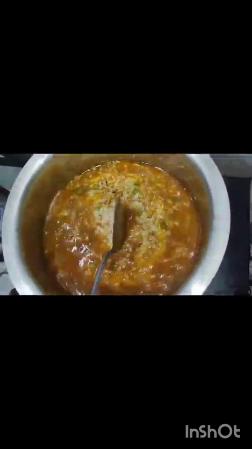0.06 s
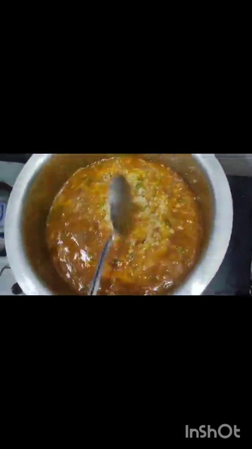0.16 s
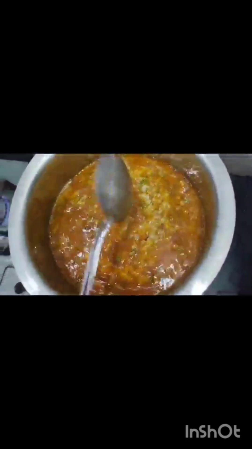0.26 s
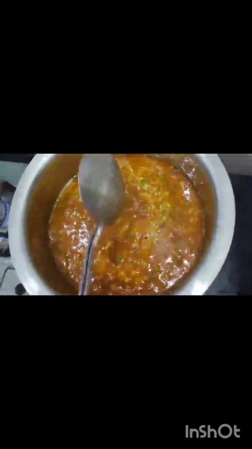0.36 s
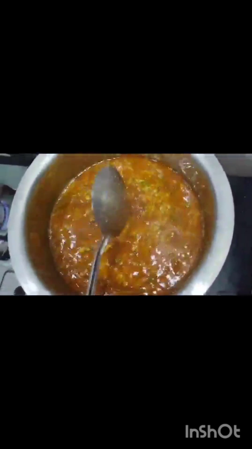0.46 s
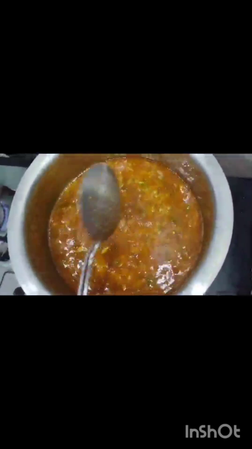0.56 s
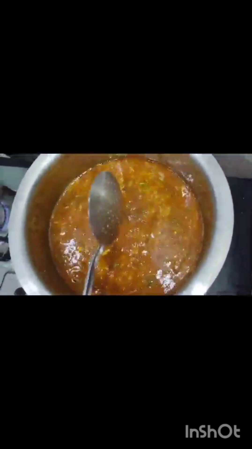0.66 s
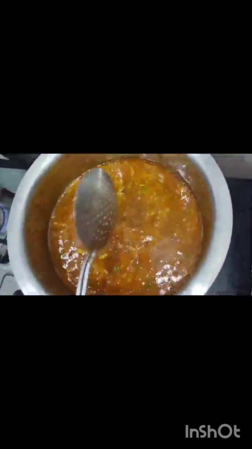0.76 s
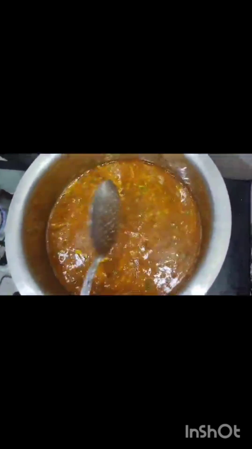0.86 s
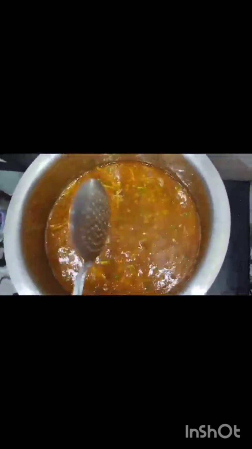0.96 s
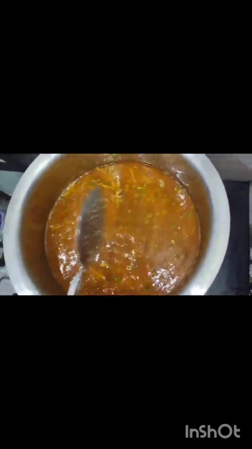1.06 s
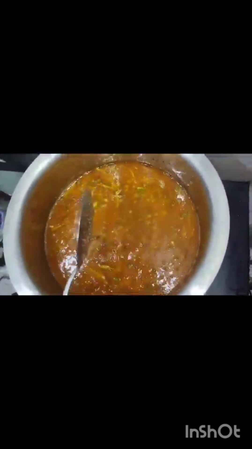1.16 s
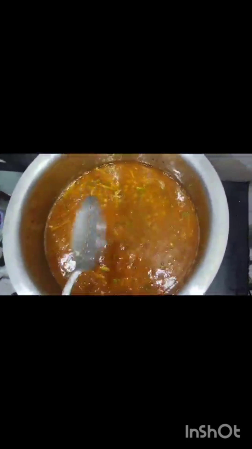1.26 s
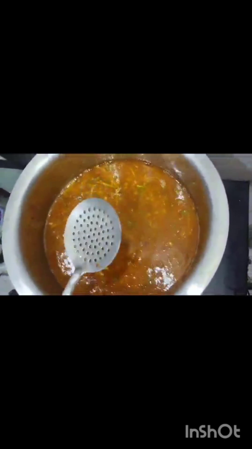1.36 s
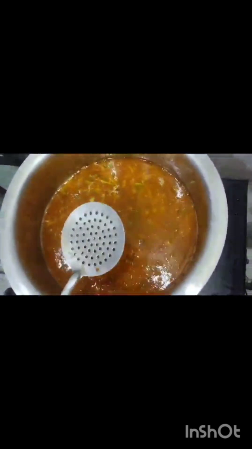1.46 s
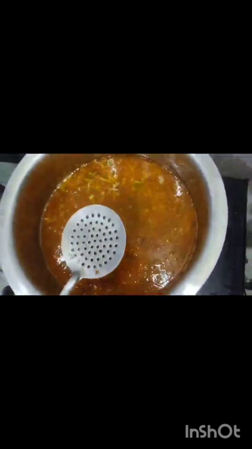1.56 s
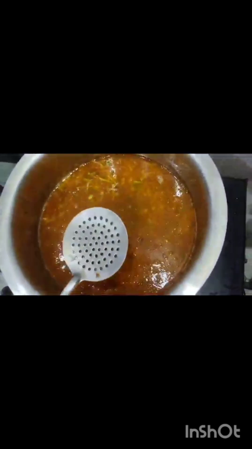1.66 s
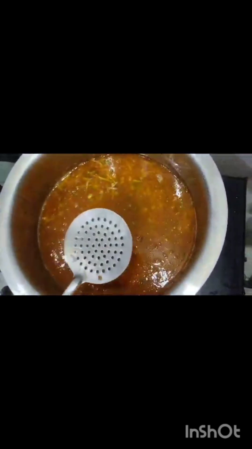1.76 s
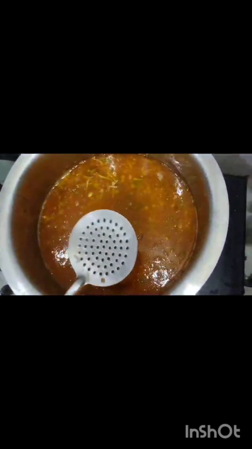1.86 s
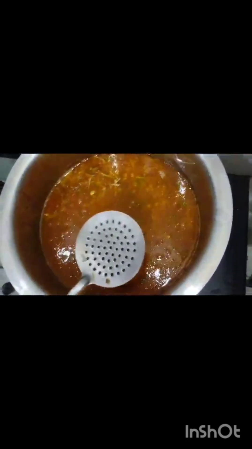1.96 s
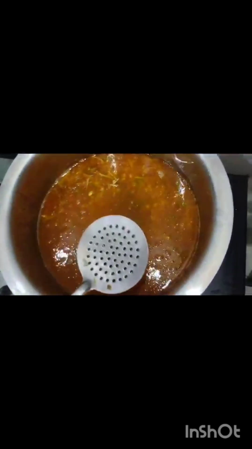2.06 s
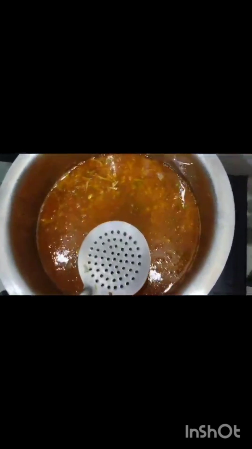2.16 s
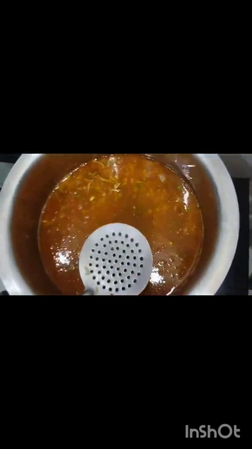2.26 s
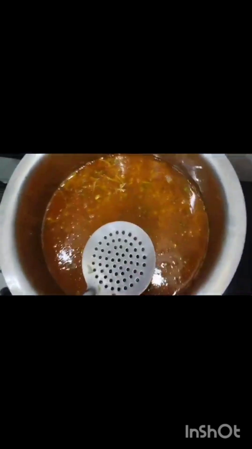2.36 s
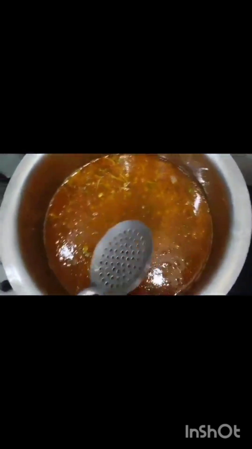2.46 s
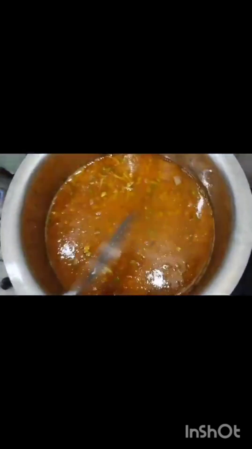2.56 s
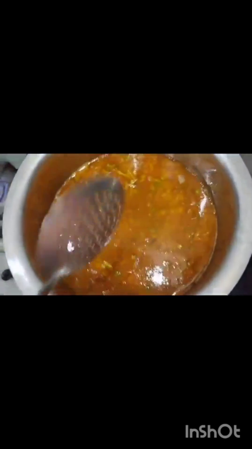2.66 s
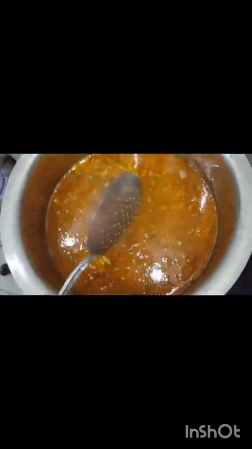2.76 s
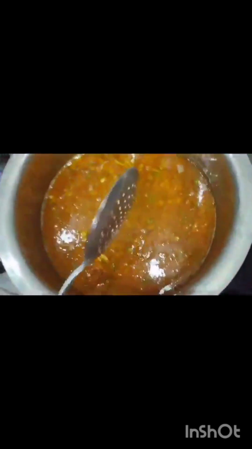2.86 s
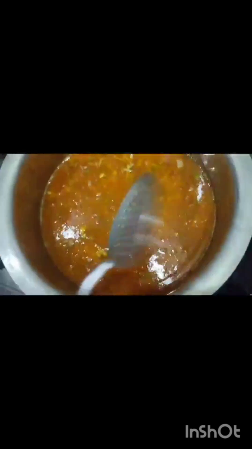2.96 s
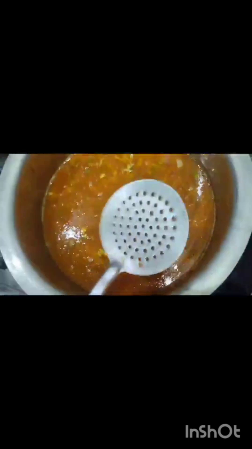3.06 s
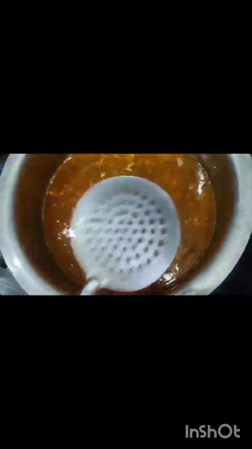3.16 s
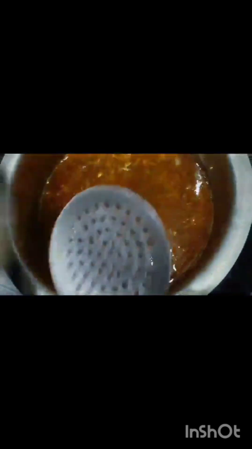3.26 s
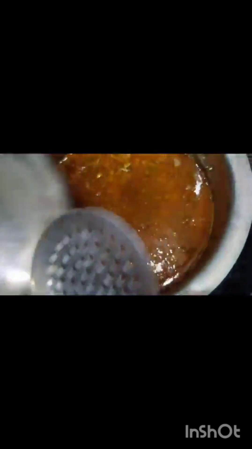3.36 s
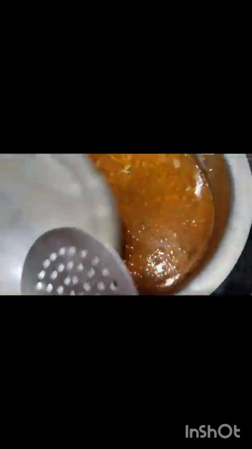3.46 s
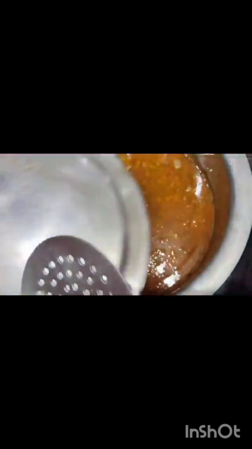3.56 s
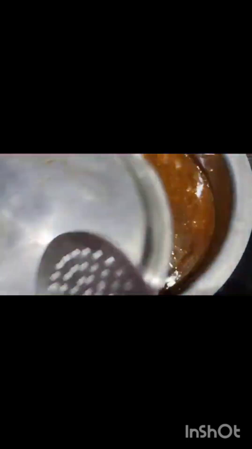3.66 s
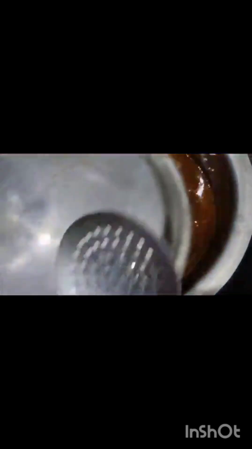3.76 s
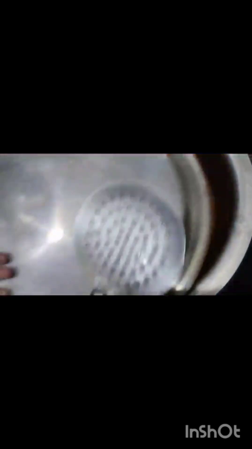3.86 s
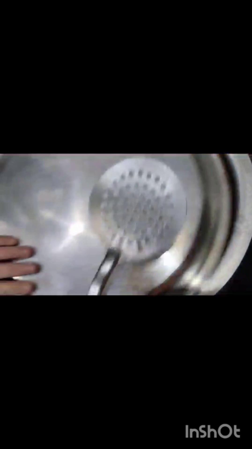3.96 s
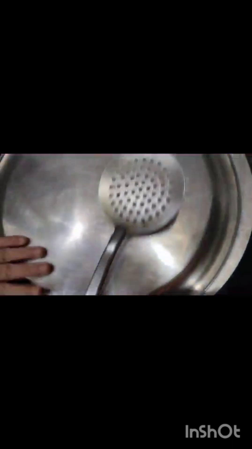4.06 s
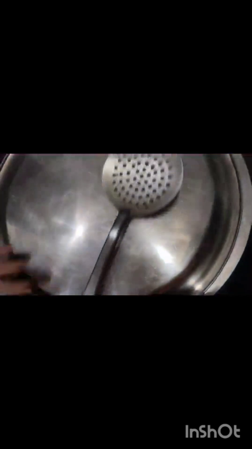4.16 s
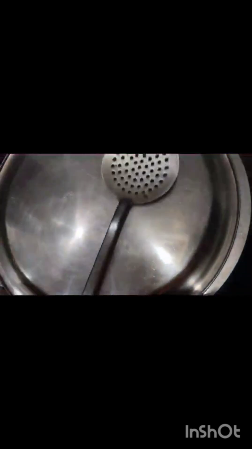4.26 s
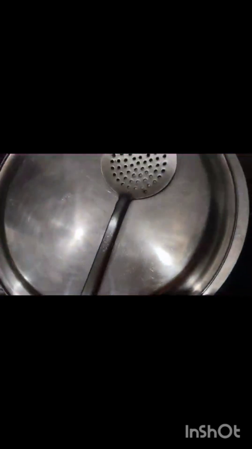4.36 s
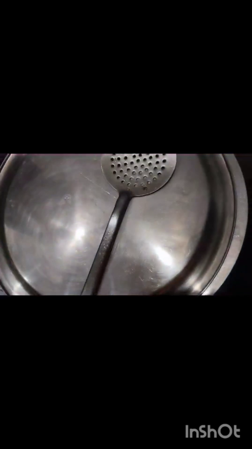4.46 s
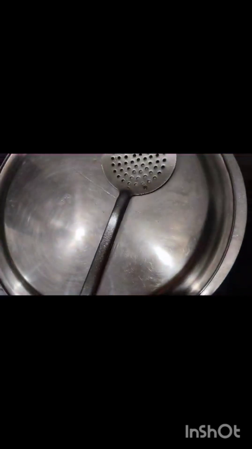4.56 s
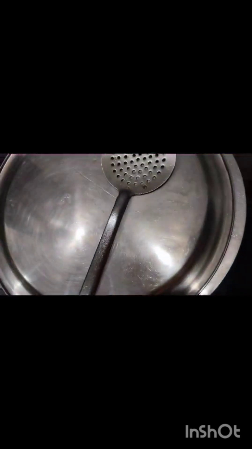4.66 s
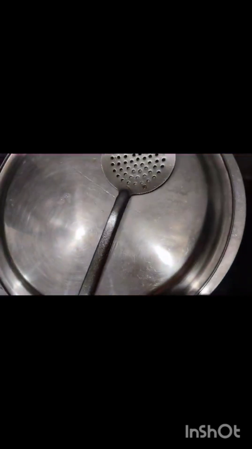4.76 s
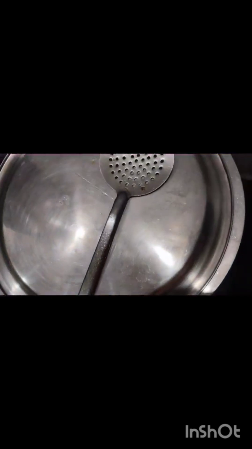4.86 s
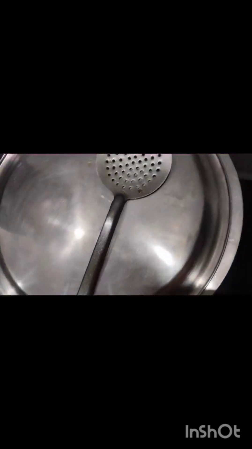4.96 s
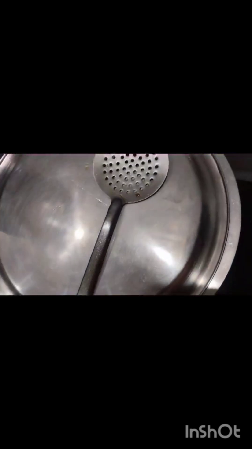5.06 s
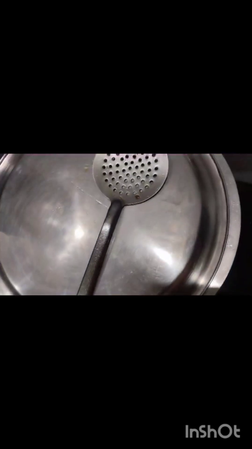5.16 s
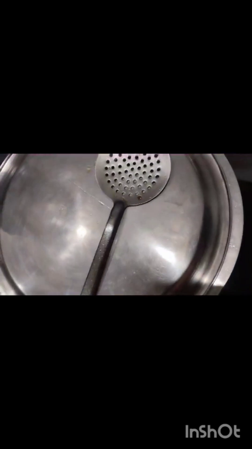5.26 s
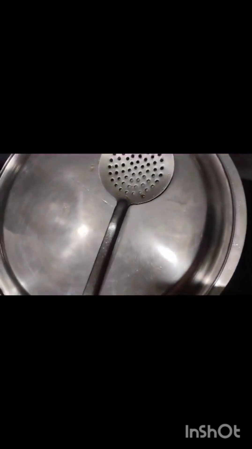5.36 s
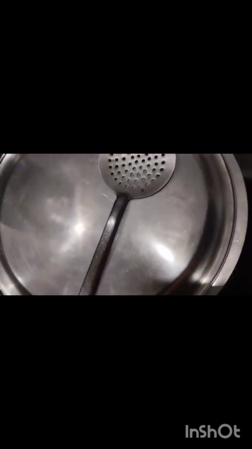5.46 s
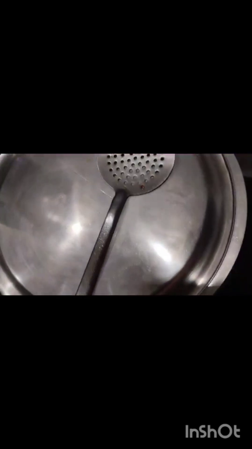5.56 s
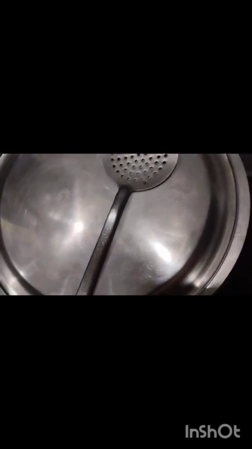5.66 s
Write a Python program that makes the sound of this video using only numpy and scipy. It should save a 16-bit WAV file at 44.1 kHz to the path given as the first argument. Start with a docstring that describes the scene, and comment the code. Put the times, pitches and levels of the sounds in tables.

```python
"""In a small hard kitchen, a slotted steel spoon is knocked clean on the rim of a big pot of curry.
Each blow rings pot and spoon as decaying sines and rocks the pot, which falls back as a burst of noise.
The spoon scrapes along the rim as grainy noise through its own ring, and taps again; a steel lid clashes on,
slides shut with a sinking hum and drops into its seat with the spoon on top.
Noise tails give the echoes; a low rush, an electric hum and a thin hiss lie underneath."""
import sys
import numpy as np
from scipy import signal
from scipy.fft import rfft, irfft, next_fast_len
from scipy.io import wavfile
from scipy.ndimage import uniform_filter1d

SR = 44100
rng = np.random.default_rng(int(sys.argv[2]) if len(sys.argv) > 2 else 0)


def log_audio(samples):
    """Write samples as a 16-bit WAV file to the path given in sys.argv[1]."""
    # one column per channel
    frames = np.atleast_2d(samples).T
    # limit to full scale, then quantise
    limited = np.clip(frames, -1, 1)
    pcm = np.round(limited * 32767).astype(np.int16)
    wavfile.write(sys.argv[1], SR, pcm)


N = 251446  # length in samples

# Colours of noise; only their shape counts. Each row: frequency in Hz, density in dB per Hz.
# The low rush, as of a burner
RUSH_SPECTRUM = [(20, -15), (35, 5.5), (50, 7), (70, 0), (100, 2.5), (150, -0.5), (300, -4.5), (700, -7),
                 (1200, -11), (1700, -9.5), (2700, -14.5), (4500, -26), (10000, -35), (16000, -41)]
# The narrow hiss of the microphone
HISS_SPECTRUM = [(20, -60), (5500, -35.5), (6500, -13), (6950, 2.5), (7230, 8.5), (7600, -4.5), (8000, 3),
                 (8600, -18.5), (10000, -22), (13000, -30.5), (14500, -18), (16000, -46.5)]
# The rub of steel on steel
FRICTION_SPECTRUM = [(150, 1.5), (800, -4), (2400, 0.5), (3500, -7), (6000, -4.5), (9000, -1.5),
                     (12000, -12.5), (16000, -19.5)]
# The loose lid sheet buzzing
PANEL_SPECTRUM = [(100, -20), (280, 1.5), (450, 8), (900, -5.5), (1200, -4.5), (1700, -15), (2500, -7),
                  (5000, -19.5), (16000, -29.5)]
# The lid meeting the rim
CLASH_SPECTRUM = [(100, 1), (500, 14.5), (1200, -2.5), (1900, -4.5), (3000, -1.5), (4200, 4), (6500, 0.5),
                  (8500, -3.5), (12000, -12), (16000, -25.5)]
# The grate rattling under the pot
GRATE_SPECTRUM = [(25, -30.5), (70, -9.5), (150, 5.5), (450, -5.5), (800, -5.5), (1200, -10), (1800, -8),
                  (3000, -18), (6000, -48), (12000, -28), (16000, -26)]
# The sharp crack of a blow
CRACK_SPECTRUM = [(100, -3.5), (400, 0), (1000, 1), (2000, 0), (3000, 4.5), (5400, 1), (8500, 5),
                  (12000, -5.5), (16000, -7.5)]

# Ringing modes. Each row: frequency in Hz, relative energy in dB, time to fall 60 dB in seconds.
# The pot wall, quickly damped by the curry
POT_MODES = [(1580, -2.5, 0.013), (1770, 1.5, 0.029), (2538, 0, 0.07), (2961, -3.5, 0.0356),
             (3342, 1, 0.0191), (3658, -7.5, 0.0164), (3958, -3, 0.0133), (4223, -2.5, 0.039),
             (4494, -0.5, 0.028), (4886, -1.5, 0.045), (5148, 4.5, 0.0214), (5485, 3.5, 0.0196),
             (5828, 2, 0.0194), (6240, 4, 0.0153), (6651, 0.5, 0.046), (7190, -0.5, 0.0202),
             (7466, 0, 0.107), (8010, -5.5, 0.023), (8386, -1.5, 0.057), (8579, 2.5, 0.019),
             (9270, 1, 0.062), (9840, -13, 0.018), (10543, -9.5, 0.034), (10770, -18, 0.046),
             (11600, -15.5, .028)]
# The spoon
SPOON_MODES = [(392, -8, .3), (738, -6, .27), (1922, -11, .22), (2490, -13, .2), (2783, -29, .35),
               (3687, -1.5, .15), (3900, -6, .19), (4215, -1, .06), (4300, -5, .12), (4565, -13, .28),
               (4866, -7, .13), (4985, -10, .22), (5540, -14, .15), (6223, -14, .16), (7630, -15, .15),
               (7955, -10, .16)]
# The stove top
STOVE_MODES = [(155, -7, .2), (199, -.5, .45), (232, -7, .2), (390, -8, .28), (425, -1, .26), (452, -4, .2),
               (510, -4, .2), (655, -6, .15), (700, -7, .14)]
# The pot rocking as a whole
ROCKING_MODES = [(65.5, 0, .32), (78, -13, .16)]
# The lid sheet
LID_MODES = [(399.2, -8.5, 0.38), (453.6, -1.5, 0.41), (481.4, 0, 0.366), (545.8, -12.5, 0.69),
             (626.5, -18.5, 0.3), (660, -9, 0.225), (749, -2.5, 0.304), (803.8, -3, 0.503),
             (840, -6.5, 0.84), (891.2, -2.5, 0.253), (1002.8, -13, 0.51), (1372, -13.5, 0.223),
             (1599, -4, 0.159), (1628, -12, 0.45), (1889, -12, 0.35), (2170, -7.5, 0.254),
             (2420, -9.5, 0.27)]
# The pot with its lid on
COVERED_POT_MODES = [(126, 0, .28), (160, -8, .2), (205, -.5, .32), (254, 0, .55), (275, -10, .3),
                     (344, -9, .25), (468, -15, .8), (813, -21, 2.2)]

# Bending of the spoon handle; the close pair throbs. Each row: frequency in Hz, relative level in dB.
HANDLE_MODES = [(184, -7), (201, 0), (438, -11)]
# Scraping strokes that swell and fade. Each row: time of the height in seconds,
# half length in seconds (to 1/e), relative friction in dB.
STROKES = [(1.839, 0.0303, -34), (2.004, 0.0784, -39.5), (2.156, 0.0478, -33.5), (3.605, 0.153, -48.5),
           (3.911, 0.0495, -51.5)]
# The lid shoved along the rim. Each row: start in seconds, length in seconds, relative level in dB,
# hum at the start in Hz.
SHOVES = [(3.723, 0.052, -31, 289.9), (3.794, 0.0283, -32, 277.4), (3.843, 0.0166, -36.5, 255.7),
          (3.915, 0.076, -38, 289.3)]
# The lid meeting pot and spoon. Each row: start in seconds, relative clash in dB, relative lid ring in dB,
# frequency that the spot favours in Hz.
KNOCKS = [(3.252, -30, -24.5, 740), (3.316, -25, -26, 760), (3.3974, -11, -17, 500), (3.453, -20, -21, 610),
          (3.486, -29.5, -27.5, 595), (3.616, -42, -49, 900), (4.075, -26.5, -25, 506),
          (4.10, -29.5, -20.5, 796), (4.132, -36, -18.5, 850), (4.176, -25, -32.5, 850),
          (4.225, -35, -29, 780), (4.29, -53.5, -32, 483)]
# The spoon on the rim. Each row: start in seconds, relative strength in dB,
# push on the pot in dB relative to the strength, seconds until the pot falls back.
TAPS = [(0.2228, -18.5, 4.5, 0.00284), (.435, -22, 2.5, 0.021), (.6349, -22.5, 1.5, .018),
        (.796, -20, 3, 0.01187), (.946, -23.5, -0.5, 0.01094), (1.0489, -34.5, -13, 0.00547),
        (2.5521, -15.6, 2.6, 0.0043), (2.7812, -21.5, -4.5, 0.00598), (3.0773, -15, -19, 0.002754),
        (3.248, -19, -19.5, 0.00773)]

# The first stroke bites and sets the handle shuddering
SHUDDER_DB, SHUDDER_SWELL_S, SHUDDER_T60_S = -32.5, 0.028, 0.75
SHOVE_ATTACK_S, SHOVE_RELEASE_S, SAG_HZ_PER_S = 0.00443, 0.0084, 300
SHOVE_BUZZ_DB, SHOVE_GRIT_DB = -11.5, -12.5  # relative to the hum
SHOVE_ROUGH_DB, SHOVE_JITTER_HZ = 1.5, 16.7  # the rim catches and lets go
SHOVE_BOOM_DB = -33.5  # the half-covered pot answers faintly
CARRIED_SPOON_DB = -6  # ring of the spoon on the lid, relative to the clash
# Once the lid is in its seat, knocks boom in the covered pot, less and less as it settles
SEAT_S, BOOM_DB, SETTLE_DB_PER_S = 4.075, -16.5, 42.5
CHATTER_DB, CHATTER_T60_S = -23.5, 0.44
# A square blow pushes the pot and rattles the grate; a glancing one leaves the spoon free to ring
RATTLE_DB, RATTLE_PER_PUSH = -2.86, 0.248  # relative to the blow; dB per dB of push
SPOON_DB, SPOON_MUTE_PER_PUSH = -10, 0.534  # the same, but push takes ring away
TICK_S, TICK_DB = 4.696, -39  # one small tick of settling steel
TOP_HZ = 15900


def amp(db):
    """Turn decibels into gain."""
    return 10 ** (np.asarray(db) / 20)


def unit(x):
    """Scale to rms 1."""
    return x / np.sqrt(np.mean(x ** 2))


def blow(x):
    """Scale to the energy of 10 ms at rms 1, so short and long sounds hit equally hard."""
    return x / np.sqrt(np.sum(x ** 2) * 100 / SR)


def clock(seconds):
    """Count sample times from zero."""
    return np.arange(int(seconds * SR) + 2) / SR


def decay(t, t60):
    """Fade exponentially, by 60 dB in t60 seconds."""
    return np.exp(-np.log(1000) * t / t60)


def add(track, at, x):
    """Mix x into the track from a given time."""
    i = int(at * SR)
    track[i:i + len(x)] += x[:len(track) - i]


def wander(rate):
    """Drift in straight lines between random levels, rate of them a second."""
    steps = np.arange(N) / SR * rate
    levels = rng.standard_normal(1024)
    return np.interp(steps, np.arange(len(levels)), levels)


def noise(spectrum, size):
    """Colour white noise by a spectrum and bring it to rms 1."""
    hz, db = np.transpose(spectrum)
    n = next_fast_len(size, True)
    bins = np.fft.rfftfreq(n, 1 / SR)
    gain = amp(np.interp(np.log(bins + 1), np.log(hz), db))
    white = rng.standard_normal(n)
    return unit(irfft(rfft(white) * gain, n)[:size])


def ring(modes, scatter_db, spot_hz=1000, focus_db=0, detune=0.00037):
    """Strike modes; the point of contact favours those near spot_hz and shares the rest out by chance."""
    t = clock(max(row[2] for row in modes))
    out = np.zeros(len(t))
    chances = rng.standard_normal((len(modes), 3))
    for (hz, db, t60), (size, shift, turn) in zip(modes, chances):
        u = t[:int(t60 * SR)]
        octaves_off = abs(np.log2(hz / spot_hz))
        # dividing by sqrt(t60) makes the table's dB an energy
        gain = amp(db + scatter_db * size - focus_db * octaves_off) / np.sqrt(t60)
        tone = np.sin(2 * np.pi * hz * (1 + detune * shift) * u)
        out[:len(u)] += np.sign(turn) * gain * decay(u, t60) * tone
    return blow(out)


def burst(spectrum, t60, rise):
    """Let countless crowded modes die together, heard as fading noise."""
    t = clock(t60)
    attack = 1 - np.exp(-t / rise)
    return blow(noise(spectrum, len(t)) * decay(t, t60) * attack)


def swell(x, rise):
    """Ease in the start, as a heavy body takes a moment to get moving."""
    t = np.arange(len(x)) / SR
    return x * (1 - np.exp(-(t / rise) ** 2))


def background():
    """A low rush as of a burner, a wavering electric hum and the narrow hiss of the microphone."""
    waver = wander(rate=7)
    phase = 2 * np.pi * 100.5 * np.arange(N) / SR + 1.07 * waver
    hum = amp(-50.0 + 2 * waver) * np.sin(phase)
    rush = amp(-47.5 + 0.11 * waver) * noise(RUSH_SPECTRUM, N)
    hiss = amp(-49.5) * noise(HISS_SPECTRUM, N)
    return rush + hiss + hum


def kitchen(x, t60_low, t60_high, gap):
    """Dense echoes from hard surfaces swell in, then lows and highs die separately."""
    t = clock(0.6)
    white = rng.standard_normal(len(t))
    low = signal.sosfilt(signal.butter(1, 5000, fs=SR, output="sos"), white)
    high = white - low
    tail = swell(low * decay(t, t60_low) + high * decay(t, t60_high), rise=gap)
    # flatten the smoothed spectrum, so that the echoes leave the balance of the modes as it is
    spectrum = rfft(tail, 2 * len(t))
    power = uniform_filter1d(abs(spectrum) ** 2, max(int(10 / t60_low), 1))
    even = irfft(spectrum / np.sqrt(power))[:len(t)]
    # the tail is kept above 110 Hz; the deep thud rings in its own modes
    even = signal.sosfilt(signal.butter(2, 110, "high", fs=SR, output="sos"), even)
    return signal.fftconvolve(x, even / np.linalg.norm(even))[:N]


def handle():
    """The spoon handle bends to and fro from the first bite of its edge and slowly comes to rest."""
    t = np.arange(N) / SR - STROKES[0][0]
    attack = np.exp(-(np.minimum(t, 0) / SHUDDER_SWELL_S) ** 2)
    fade = decay(np.maximum(t, 0), SHUDDER_T60_S)
    bending = sum(amp(db) * np.sin(2 * np.pi * hz * t) for hz, db in HANDLE_MODES)
    flutter = 1 + 0.25 * wander(rate=60)
    return amp(SHUDDER_DB) * attack * fade * bending * flutter


def scrape():
    """Dense tiny slips of uneven size hiss and excite pot and spoon."""
    t = np.arange(N) / SR
    grip = sum(amp(db) * np.exp(-((t - at) / half) ** 2) for at, half, db in STROKES)
    grip = grip * amp(1.68 * wander(rate=120))  # the edge catches and lets go
    slip_sizes = amp(3.5 * rng.exponential(size=N))
    slips = grip * unit(rng.standard_normal(N) * slip_sizes)
    steel = amp(-3) * ring(SPOON_MODES, scatter_db=1.5, spot_hz=2600, focus_db=6)
    add(steel, 0, ring(POT_MODES, scatter_db=1.5, spot_hz=2700, focus_db=9))
    rung = signal.fftconvolve(slips, steel / np.linalg.norm(steel))[:N]
    return amp(-4.5) * rung + amp(-1.5) * grip * noise(FRICTION_SPECTRUM, N)


def shoves():
    """Each shove grinds and buzzes the lid; the air under it hums, sinking as the gap narrows."""
    clank, body = np.zeros((2, N))
    t = clock(0.25)
    for at, length, db, hz in SHOVES:
        release = np.exp(-np.maximum(t - length, 0) / SHOVE_RELEASE_S)
        effort = amp(db) * swell(release, rise=SHOVE_ATTACK_S)
        catch = wander(rate=107.2)[:len(t)]
        pitch = hz - SAG_HZ_PER_S * t + SHOVE_JITTER_HZ * catch
        hum = amp(SHOVE_ROUGH_DB * catch) * np.sin(2 * np.pi * np.cumsum(pitch) / SR)
        buzz = amp(SHOVE_BUZZ_DB) * noise(PANEL_SPECTRUM, len(t))
        boom = swell(ring(COVERED_POT_MODES, scatter_db=0.5, detune=0.02), rise=0.0102)
        add(body, at, effort * (unit(hum) + buzz))
        add(body, at, amp(SHOVE_BOOM_DB) * boom)
        add(clank, at, effort * amp(SHOVE_GRIT_DB) * noise(CRACK_SPECTRUM, len(t)))
    return clank, body


def lid():
    """The lid clashes on the rim, then chatters into its seat, where the covered pot booms."""
    clank, body = np.zeros((2, N))
    for at, db, lid_db, spot_hz in KNOCKS:
        wall = ring(POT_MODES, scatter_db=2, detune=0.008)
        sheet = ring(LID_MODES, scatter_db=1.5, spot_hz=spot_hz, focus_db=5, detune=0.005)
        buzz = burst(PANEL_SPECTRUM, t60=0.49, rise=0.00174)
        add(clank, at, amp(db - 3.0) * burst(CLASH_SPECTRUM, t60=0.033, rise=0.000344))
        add(clank, at, amp(db - 12.0) * wall)
        add(body, at, amp(lid_db) * sheet)
        add(body, at, amp(lid_db - 7) * buzz)
        add(body, at, amp(db + CARRIED_SPOON_DB) * ring(SPOON_MODES, scatter_db=4.5))
        if at >= SEAT_S:
            boom_db = BOOM_DB - SETTLE_DB_PER_S * (at - SEAT_S)
            add(body, at, amp(boom_db) * ring(COVERED_POT_MODES, scatter_db=1.75, detune=0.00587))
    add(clank, SEAT_S, amp(CHATTER_DB) * burst(CLASH_SPECTRUM, t60=CHATTER_T60_S, rise=0.0043))
    return clank, body


def taps():
    """Each blow cracks, rings pot wall and spoon, then rocks the pot, which falls back on its rattling grate."""
    clank, body = np.zeros((2, N))
    for at, db, push_db, lag in TAPS:
        spoon_db = db + SPOON_DB - SPOON_MUTE_PER_PUSH * push_db
        rattle_db = db + RATTLE_DB + RATTLE_PER_PUSH * push_db
        rocking = swell(ring(ROCKING_MODES, scatter_db=1, detune=0.0082), rise=0.0146)
        stove = swell(ring(STOVE_MODES, scatter_db=2.5, detune=0.0099), rise=0.00702)
        add(clank, at, amp(db - 1.0) * ring(POT_MODES, scatter_db=2.5, detune=0.00533))
        add(clank, at, amp(db - 4.5) * burst(CRACK_SPECTRUM, t60=0.019, rise=0.0007))
        add(body, at, amp(spoon_db) * ring(SPOON_MODES, scatter_db=1.56))
        add(body, at + 0.00277, amp(db + push_db + 1.25) * rocking)
        add(body, at + 0.00321, amp(db + push_db - 4.5) * stove)
        add(body, at + lag, amp(rattle_db) * burst(GRATE_SPECTRUM, t60=0.331, rise=0.0048))
    add(body, TICK_S, amp(TICK_DB) * burst(CRACK_SPECTRUM, t60=0.003, rise=0.00014))
    return clank, body


def scene():
    """Pot, spoon and lid close to the microphone, the stove top just under them and the room behind."""
    clank, body = np.sum([taps(), lid(), shoves()], axis=0)
    rub = scrape()
    near = kitchen(clank, t60_low=0.012, t60_high=0.014, gap=0.003)  # off the stove top
    room_send = amp(-6.0) * (clank + rub) + amp(-12.5) * body
    room = kitchen(room_send, t60_low=0.266, t60_high=0.214, gap=0.00723)
    direct = amp(-4.5) * clank + amp(-2.5) * (body + rub) + handle()
    return (direct + amp(-6.0) * near + room + background())[None]


def record(dry):
    """The phone rounds the tallest peaks and cuts the top."""
    rounded = 0.7192 * np.tanh(dry / 0.6687)
    low_pass = signal.ellip(10, 0.2, 70, TOP_HZ, fs=SR, output="sos")
    return signal.sosfilt(low_pass, rounded)


dry = scene()
out = record(dry)
log_audio(out)
```